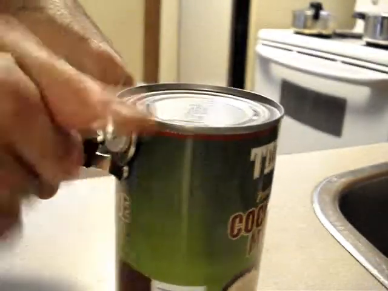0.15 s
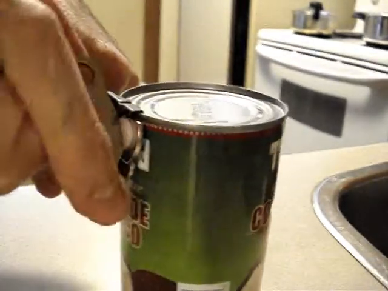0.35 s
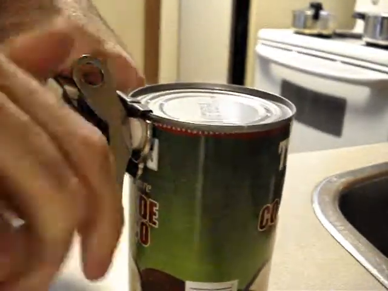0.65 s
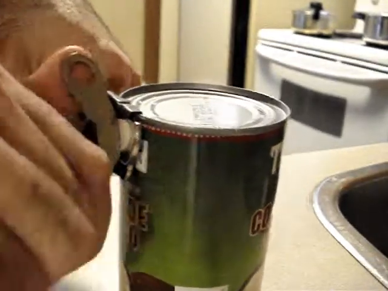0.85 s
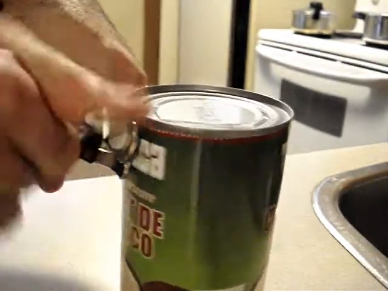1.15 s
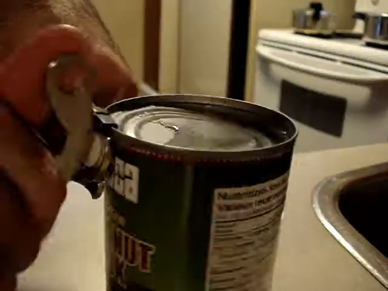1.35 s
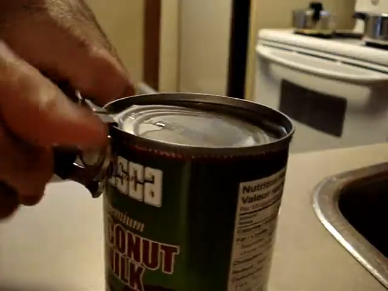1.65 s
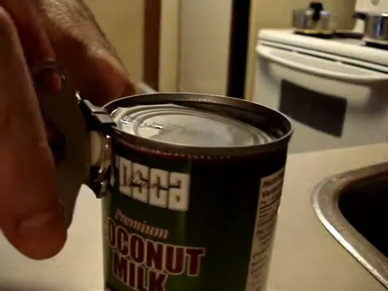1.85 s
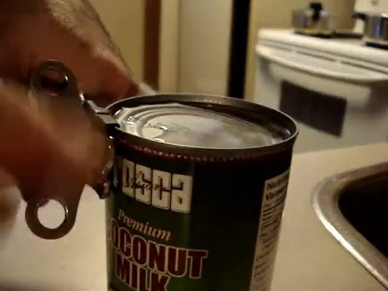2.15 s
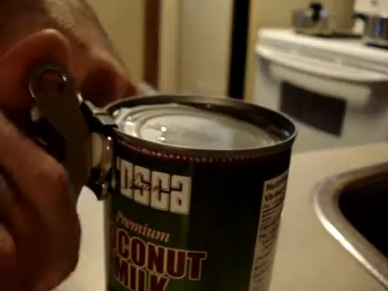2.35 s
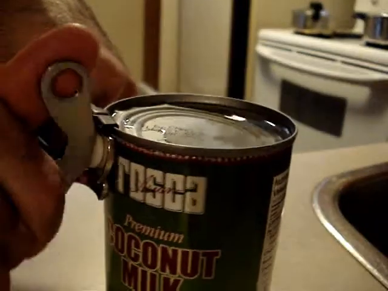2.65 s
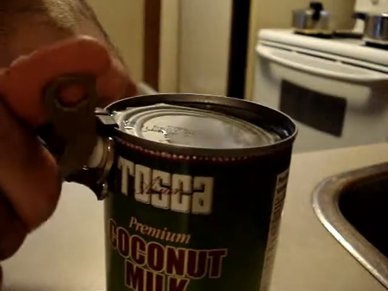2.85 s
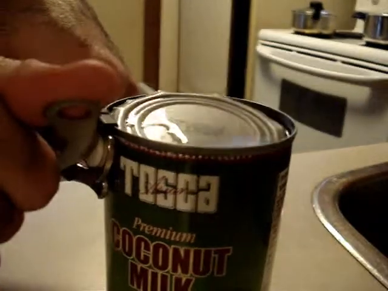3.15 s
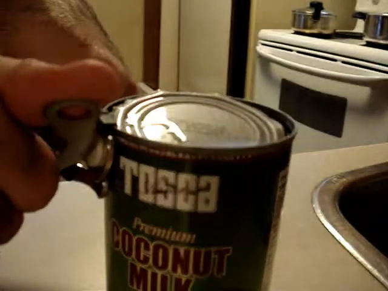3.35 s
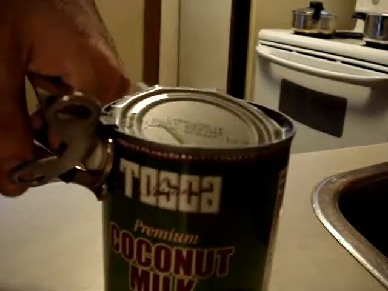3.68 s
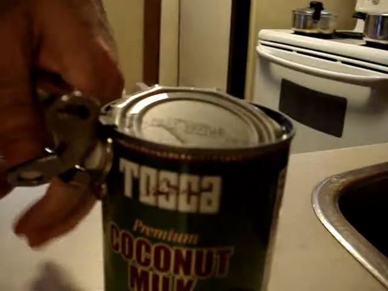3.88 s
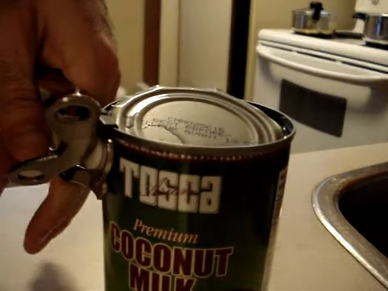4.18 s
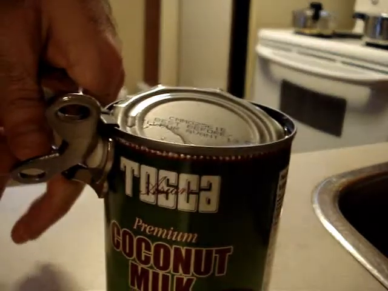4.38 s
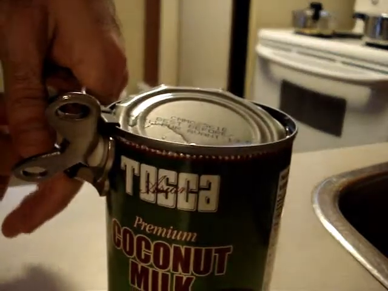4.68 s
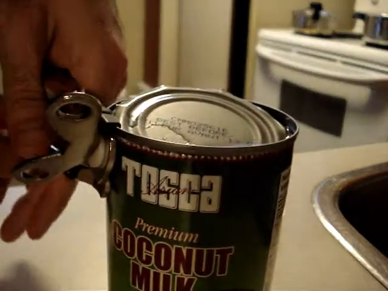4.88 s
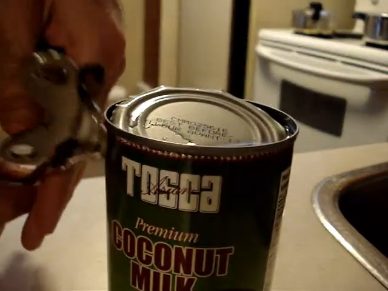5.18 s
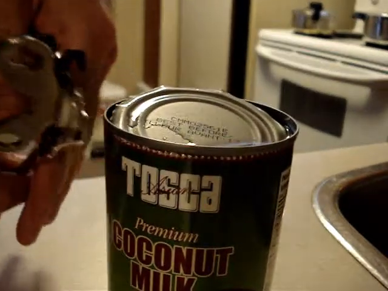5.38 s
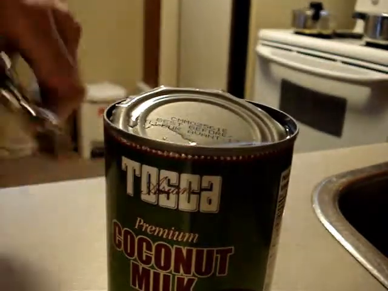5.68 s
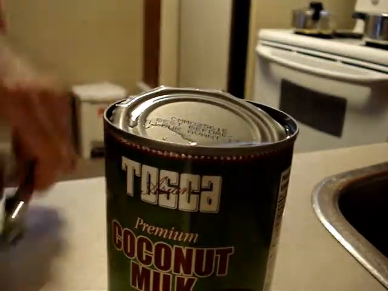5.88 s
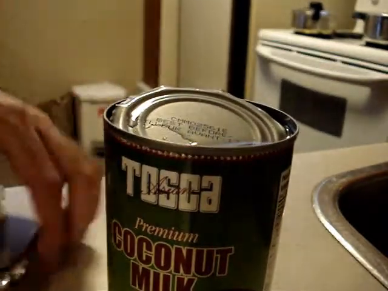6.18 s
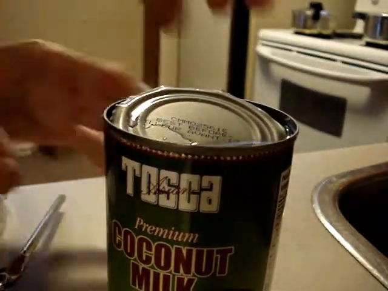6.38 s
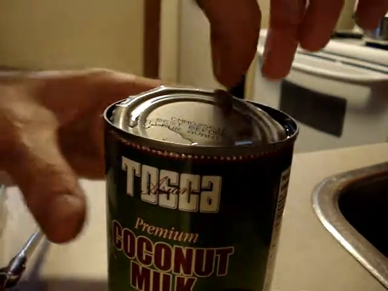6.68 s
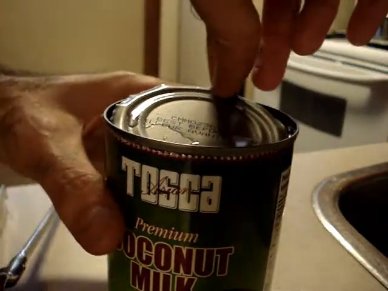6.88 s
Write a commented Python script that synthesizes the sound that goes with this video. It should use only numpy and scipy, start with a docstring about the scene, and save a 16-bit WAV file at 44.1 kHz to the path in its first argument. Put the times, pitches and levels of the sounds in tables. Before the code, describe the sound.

Close to a small microphone in a kitchen, a hand-cranked opener starts cutting a full tin at about 0.1 s: uneven gritty scrapes in quick jerks, with piercing, wavering squeals, until 0.5 s. A dull tin thud falls at 0.9 s. Scraping resumes from 1.05 to 1.25 s, then grows almost continuous from 1.35 to 2.05 s, with a strong thud at 1.5 s and many high squeaks. Short isolated scrapes come at 2.65, 2.75 and 3.05 s, and a click with a soft tin knock at 3.7 s. Quiet hum and hiss remain until small knocks and ticks at 5.1 s and a sharper metallic click at 5.7 s. The opener lands loudly on the counter at 6.05 s, clatters hardest around 6.22-6.26 s, then knocks at 6.35 and 6.5 s. A short room echo dies into faint hum and hiss until 7 s.

```python
"""Tin opener on a kitchen counter

Close to a small microphone, a hand-cranked opener jerks round the rim of a full tin: gritty noise
scrapes, and wandering near-sines squeal. Decaying modes make the tin thud and the opener tick as it
comes off; it is laid on the counter and bounces, in noise that dies away band by band.
A kitchen echo follows, low rumble passes through the counter, and room hum and hiss lie underneath."""
import sys
import numpy as np
from scipy import signal
from scipy.fft import rfft, irfft
from scipy.io import wavfile
from scipy.ndimage import uniform_filter1d

SR = 44100
rng = np.random.default_rng(int(sys.argv[2]) if len(sys.argv) > 2 else 0)


def pcm_store(signal):
    """Save signal as 16-bit PCM."""
    levels = np.round(np.clip(np.atleast_2d(signal), -1, 1) * 32767)
    wavfile.write(sys.argv[1], SR, levels.astype(np.int16).T)


N = 310192  # samples, about 7 s

# room background over time: [t/s, hum level/dB, hiss level/dB]
FLOOR_LEVELS = [(0, -62.5, -60), (.6, -62, -59.5), (2.1, -65.5, -60), (2.8, -61.5, -57), (3.499, -62, -58),
                (3.75, -55, -56), (5, -52, -56.5), (6, -49, -53.5), (6.3, -58.5, -60), (7.03, -52, -56)]
# relative spectrum of the room hum: [f/Hz, level/dB]
HUM_SPECTRUM = [(12, -36), (20, 2.5), (38, -10.5), (115, -8), (250, -4.5), (292, -2.5), (664, -5.5),
                (742, -5), (4000, -20), (5200, -35.5), (8800, -120)]
# relative spectrum of the hiss: [f/Hz, level/dB]
HISS_SPECTRUM = [(880, -4), (1500, -4.5), (3220, -7.5), (3880, -6.5), (5710, -10), (7170, -10.5),
                 (7760, -9.5), (9650, -12), (10600, -24.5), (15100, -20.5), (16000, -30.5)]
# thin tones of fixed pitch in the hiss: [f/Hz, mean level over the hiss/dB]
WHINE_TONES = [(7000, -22.5), (7555, -18), (7585, -12.5), (8000, -23), (8300, -18)]
HUM_TONE_HZ = 115

# jerks of the cutting wheel: [t/s, length/s, scrape level/dB]
SLIPS = [(0.079, 0.026, -32.5), (0.121, 0.016, -33), (0.136, 0.017, -29.5), (0.162, 0.056, -29.5),
         (0.219, 0.034, -34.5), (0.28, 0.028, -36.5), (0.321, 0.028, -32), (0.352, 0.061, -32),
         (0.427, 0.018, -36.5), (0.457, 0.0076, -42.5), (1.058, 0.015, -34.5), (1.088, 0.014, -40),
         (1.102, 0.048, -33.5), (1.154, 0.079, -30.5), (1.335, 0.017, -40), (1.357, 0.0085, -40.5),
         (1.376, 0.012, -36), (1.406, 0.046, -36.5), (1.509, 0.077, -33), (1.595, 0.052, -31),
         (1.651, 0.052, -33.5), (1.708, 0.0357, -35), (1.758, 0.066, -32), (1.828, 0.075, -30.5),
         (1.914, 0.05, -32), (1.973, 0.036, -30.5), (2.042, 0.039, -55.5), (2.633, 0.043, -35.5),
         (2.69, 0.04, -52.5), (2.741, 0.0078, -50), (2.759, 0.014, -33.5), (3.051, 0.046, -31.5),
         (3.105, 0.041, -50.5)]
# relative spectrum of the scrape: [f/Hz, level/dB]
SCRAPE_SPECTRUM = [(88, -38.5), (150, -12.5), (504, -6.5), (1870, -15.5), (2270, -9.5), (2810, -11.5),
                   (4410, -4.5), (5360, -7), (7180, -4.5), (9630, -7.5), (10600, -12.5), (16000, -7)]
# squeals that stand out: [t/s, glide length/s, start f/Hz, end f/Hz, level/dB]
SQUEALS = [(0.091, 0.013, 2900, 3210, -31.5), (0.136, 0.016, 4390, 4530, -22.5),
           (0.143, 0.016, 3040, 3200, -30), (0.169, 0.02, 4370, 4410, -20.5),
           (0.176, 0.015, 6710, 6860, -23), (0.19, 0.037, 3490, 4140, -28), (0.22, 0.032, 9040, 8640, -39),
           (0.242, 0.018, 2170, 2270, -35.5), (0.244, 0.017, 9800, 9500, -26),
           (0.285, 0.022, 8600, 9100, -32), (0.329, 0.015, 9830, 9700, -27.5),
           (0.355, 0.026, 4180, 4210, -30), (0.396, 0.012, 4300, 4250, -28),
           (0.437, 0.0087, 7230, 8040, -30.5), (1.104, 0.044, 4400, 4280, -35),
           (1.133, 0.007, 7500, 7350, -19), (1.149, 0.021, 7500, 7500, -29.5),
           (1.153, 0.044, 4350, 3630, -28), (1.184, 0.026, 3600, 4470, -28),
           (1.207, 0.015, 8800, 8800, -27), (1.229, 0.014, 9840, 9800, -31.5),
           (1.343, 0.0093, 9300, 9790, -33.5), (1.424, 0.028, 3580, 3550, -29.5),
           (1.511, 0.018, 3106, 3300, -27.5), (1.535, 0.024, 3280, 3280, -29.5),
           (1.558, 0.041, 7300, 7960, -32.5), (1.563, 0.037, 3750, 4000, -26),
           (1.602, 0.019, 9400, 9770, -29), (1.615, 0.038, 7950, 7840, -26.5),
           (1.654, 0.023, 6570, 6700, -32), (1.683, 0.021, 7400, 7340, -24.5),
           (1.71, 0.02, 9200, 9800, -28.5), (1.734, 0.057, 6990, 7300, -33.5),
           (1.762, 0.012, 7970, 8300, -28), (1.798, 0.015, 8270, 8600, -26.5),
           (1.832, 0.0096, 7010, 6960, -23.5), (1.849, 0.029, 6920, 7470, -26),
           (1.85, 0.021, 7830, 8050, -26.5), (1.876, 0.026, 7100, 7300, -31),
           (1.89, 0.016, 8190, 8300, -26.5), (1.914, 0.024, 8000, 7000, -25.5),
           (1.934, 0.011, 4940, 5500, -25.5), (1.954, 0.031, 9500, 9370, -29),
           (1.994, 0.0084, 7700, 7300, -21), (2.63, 0.0071, 7780, 7820, -28.5),
           (2.641, 0.037, 8940, 9060, -25.5), (2.643, 0.036, 3150, 2990, -40.5),
           (2.645, 0.03, 1227, 1284, -46.5), (2.758, 0.013, 7500, 7180, -25),
           (3.052, 0.024, 7290, 7080, -32), (3.058, 0.031, 3550, 3320, -39.5),
           (3.083, 0.024, 2150, 2260, -38.5)]
# modes of wheel and lid for the lesser squeals: [centre f/Hz, highest level over the scrape/dB]
WHEEL_MODES = [(3200, -3), (4300, -2.5), (6100, -1), (7200, 2), (8500, 2), (9200, 0.5), (9800, -1.5)]
# mean rate while slipping, middle glide length, scale of the glide as a share of the pitch
LESSER_PER_S, LESSER_S, LESSER_GLIDE = 90, 0.0091, 0.03

# blows on the tin: [t/s, peak level of the ring/dB, f favoured/Hz]
THUDS = [(0.327, -28, 760), (0.431, -35.5, 821), (0.481, -31.5, 710), (0.907, -19, 830),
         (1.134, -35.5, 420), (1.386, -26.5, 820), (1.512, -17, 694), (1.648, -28.5, 408),
         (2.632, -42, 1260), (2.761, -40, 646), (3.141, -35.5, 1010), (3.705, -30.5, 579),
         (3.719, -33.5, 285), (5.101, -34.5, 296), (5.119, -31.5, 328), (5.141, -34.5, 659),
         (6.057, -11.5, 700), (6.35, -15, 1140), (6.502, -12.5, 1500), (6.508, -26.5, 274)]
# what rings in the tin: [centre f/Hz, relative level/dB, t60/s]
TIN_MODES = [(273.8, -5, 0.16), (407, -5.5, 0.059), (570, -1.5, 0.045), (818, 5.5, 0.038),
             (1033, 1.5, 0.036), (1538, 1, 0.044), (2047, -4.5, 0.057)]
# knocks of the opener: [t/s, peak level of the ring/dB, f favoured/Hz]
TICKS = [(2.7894, -49, 4750), (3.7074, -28, 3840), (5.1138, -36.5, 4090), (5.1412, -29, 4160),
         (5.1702, -30, 5460), (5.664, -30, 4600), (5.682, -17, 3270), (5.705, -42, 2530),
         (6.0536, -10.5, 2950), (6.2232, -10, 3050), (6.2423, -12, 2740), (6.247, -26, 6900),
         (6.262, -25.5, 2900), (6.351, -23, 2800), (6.5041, -23, 2860), (6.519, -34, 4270)]
# what rings in the opener: [centre f/Hz, relative level/dB, t60/s]
OPENER_MODES = [(2960, 5.5, 0.042), (3260, 1, 0.026), (3857, 1, 0.057), (4310, 6.5, 0.014),
                (5260, -2, 0.047), (6930, 5.5, 0.039), (8050, 21.5, 0.0091), (9000, 14.5, 0.028)]

# the opener meets the counter: [t/s, relative level/dB, brightness/dB per octave]
BANGS = [(6.052, -4.5, -0.5), (6.109, -23.5, 1), (6.221, -0.5, 0.5), (6.243, 1.5, -0.5), (6.262, -18, -5.5),
         (6.35, -12, -0.5), (6.503, -12, 0), (6.519, -21.5, -3)]
# relative spectrum of the counter when struck: [f/Hz, level/dB]
COUNTER_SPECTRUM = [(15, -24), (35, -19.5), (70, -35), (170, -43), (280, -14), (480, -15.5), (1000, -6),
                    (1500, -2.5), (3200, -10), (5400, -25), (7400, -30.5), (10500, -30.5), (12000, -43),
                    (14000, -29), (16000, -37)]
# how long the counter rings: [f/Hz, t60/s]
COUNTER_DECAY = [(100, 0.24), (800, 0.21), (2000, 0.16), (5000, 0.11), (14000, 0.31)]

ROOM_T60_S, ROOM_DB = 0.31, -13
DRY_SHARE = .35  # share of squeals and ticks that reaches the echo
TOP_HZ = 15900  # upper limit of the recorder


def undb(db):
    """Turns dB into an amplitude factor."""
    return 10 ** (np.asarray(db) / 20)


def unit(x):
    """Scales x to rms 1."""
    return x / np.sqrt(np.mean(x ** 2))


def read(table, hz):
    """Reads a table by frequency, on a log-frequency axis."""
    f, value = np.transpose(table)
    return np.interp(np.log(np.maximum(hz, 1)), np.log(f), value)


def colour(x, table):
    """Filters x by the spectrum of a table and scales it to rms 1."""
    gain = undb(read(table, np.fft.rfftfreq(len(x), 1 / SR)))
    return unit(irfft(rfft(x) * gain, len(x)))


def walk(rate, size):
    """Random levels, a new one every 1 / rate s, smoothed twice; spread near 1."""
    hold = max(int(SR / rate), 1)
    steps = np.repeat(rng.standard_normal(size // hold + 1), hold)
    return 1.44 * uniform_filter1d(uniform_filter1d(steps, hold), hold)[:size]


def add(out, s, x):
    """Mixes x in at s seconds."""
    i = int(s * SR)
    out[i:i + len(x)] += x[:N - i]


def fade(t, t60):
    """Exponential decay by 60 dB in t60 seconds."""
    return np.exp(-np.log(1000) * t / t60)


def background():
    """Room hum with a low tone, and hiss with thin tones; hum, hiss and tones follow their own levels."""
    t = np.arange(N) / SR
    s, hum_db, hiss_db = np.transpose(FLOOR_LEVELS)
    hum_tone = undb(-17 + 4 * walk(18, N)) * np.sin(2 * np.pi * HUM_TONE_HZ * t)
    hum_gain = undb(np.interp(t, s, hum_db) + 0.35 * walk(4.6, N))
    hum = hum_gain * (colour(rng.standard_normal(N), HUM_SPECTRUM) + hum_tone)
    whine = sum(undb(db + 2. * walk(7.3, N)) * np.sin(2 * np.pi * hz * t) for hz, db in WHINE_TONES)
    hiss = colour(rng.standard_normal(N), HISS_SPECTRUM) + whine
    return hum + undb(np.interp(t, s, hiss_db)) * hiss


def push():
    """How hard the wheel scrapes: quick to start, a little slower to stop."""
    t, effort = np.arange(N) / SR, np.zeros(N)
    for s, length, db in SLIPS:
        start = np.clip((t - s) / .007 + .7, 0, 1) ** 2
        stop = fade(np.maximum(t - s - length, 0), 0.028)
        effort = np.maximum(effort, undb(db) * start * stop)
    return effort


def rumble(effort):
    """Low shaking passed on through the counter while the hand works."""
    shake = colour(rng.standard_normal(N), [(15, 1), (30, -6.5), (100, -9), (250, -18.0), (600, -54)])
    return undb(-19) * uniform_filter1d(effort, int(.08 * SR)) * shake


def tone(length, hz0, hz1):
    """Contact locked on to a mode of wheel or lid: a near sine that wanders and throbs, with a weak octave."""
    t = np.arange(int((length + .004) * SR)) / SR
    hz = np.interp(t, [0, length], [hz0, hz1]) + 110 * walk(700, len(t))
    phase = 2 * np.pi * np.cumsum(hz) / SR
    # fast unevenness spreads a noisy skirt round the line
    rasp = 1 + .25 * walk(1800, len(t))
    # only squeals that end below 7 kHz carry the octave
    octave = undb(-18.0) * np.sin(2 * phase) * (hz1 < 7000)
    # linear rise in 0.86 ms, linear fall in 2.6 ms
    shape = np.sqrt(2) * np.clip(np.minimum(t / 0.00086, (t[-1] - t) / 0.0026), 0, 1)
    throb = undb(2.96 * np.minimum(walk(330, len(t)), 1.2))
    return throb * shape * rasp * (np.sin(phase) + octave)


def scrape():
    """Dense grit clicks of uneven size, and a swarm of faint brief squeals at pitches spread at random."""
    grit = rng.standard_normal(N) * undb(2. * rng.exponential(size=N))
    swarm = np.zeros(N)
    for when, length, pitch, glide, size in rng.random((1300, 5)):
        hz = 1000 + 10000 * pitch
        squeal = tone(.002 + .014 * length ** 2, hz, hz + 500 * (glide - .4))
        add(swarm, 3.3 * when, undb(10 * size) * squeal)
    return colour(unit(grit) + undb(-1.5) * unit(swarm), SCRAPE_SPECTRUM)


def squeals():
    """Stick and slip at the rim: loud squeals one by one, lesser ones by chance within the jerks."""
    out = np.zeros(N)
    for s, length, hz0, hz1, db in SQUEALS:
        add(out, s - .001, undb(db) * tone(length, hz0, hz1))
    for s, slip, slip_db in SLIPS:
        chance = rng.random((8, 7))  # up to eight lesser squeals a jerk
        for keep, when, mode, length, tune, glide, size in chance:
            if keep < LESSER_PER_S * slip / len(chance):
                hz, db = WHEEL_MODES[int(mode * len(WHEEL_MODES))]
                hz = hz * (1 + .06 * (tune - .5))
                end_hz = hz * (1 + LESSER_GLIDE * (2 * glide - .7))
                squeal = tone(LESSER_S * (.5 + length), hz, end_hz)
                add(out, s + .7 * slip * when, undb(slip_db + db - 9.9 * size) * squeal)
    return out


def strike(blows, modes, slope_db, crack_db, contact_s):
    """Blows ring shared modes, favouring those near their own pitch; rattle roughens them over a noise crack."""
    out, t = np.zeros(N), np.arange(SR // 4) / SR
    hz, db, t60 = np.transpose(modes)[:, :, None]
    for s, peak_db, blow_hz in blows:
        chance = rng.standard_normal((2, len(modes), 1))
        # slope_db is lost per octave away from the pitch of the blow
        gain = undb(db - slope_db * abs(np.log2(hz / blow_hz)) + 2. * chance[0])
        rattle = np.array([1 + 1.07 * walk(420, len(t)) for _ in modes])
        sines = np.sin(2 * np.pi * hz * (1 + 0.017 * chance[1]) * t)
        ring = np.sum(gain * rattle * fade(t, t60) * sines, axis=0)
        ring = ring * (1 - np.exp(-t / contact_s))  # a softer contact rises more slowly
        crack_spectrum = [(60, -40), (180, -12), (blow_hz, 0), (10000, -8), (15000, -14)]
        crack = colour(rng.standard_normal(len(t)), crack_spectrum) * fade(t, 0.041)
        add(out, s, undb(peak_db) * (ring / abs(ring).max() + undb(crack_db) * crack))
    return out


def bangs():
    """The counter has too many modes to tell apart: noise with a stronger onset dies away band by band."""
    out, t = np.zeros(N), np.arange(SR // 2) / SR
    f = np.fft.rfftfreq(len(t), 1 / SR)
    for s, level_db, tilt_db in BANGS:
        spectrum = rfft(colour(rng.standard_normal(len(t)), COUNTER_SPECTRUM))
        bang = 0
        for hz in 30 * 2 ** np.arange(10):  # overlapping bands, an octave apart
            weight = np.clip(1 - abs(np.log2(np.maximum(f, 1) / hz)), 0, 1)
            band = irfft(spectrum * weight, len(t))
            tilt = undb(tilt_db * np.log2(hz / 1500))
            bang = bang + tilt * band * fade(t, read(COUNTER_DECAY, hz))
        onset = 1 + 0.26 * fade(t, 0.025)
        add(out, s, undb(level_db - 12) * bang * onset)
    return out


def kitchen(x):
    """Kitchen echo: decaying noise that starts after the first wall, duller than the direct sound."""
    t = np.arange(SR // 2) / SR
    echo = colour(rng.standard_normal(len(t)), [(200, 4), (3000, 0.0), (12000, -8.0)])
    echo = echo * fade(t, ROOM_T60_S) * (t > .004)
    return undb(ROOM_DB) * signal.fftconvolve(x, echo / np.sqrt(np.sum(echo ** 2)))[:N]


def scene():
    """Sums the opener, tin and counter with their echo, the rumble and the room background."""
    effort = push()
    # the wheel judders, so scrape and squeals flutter together
    judder = undb(1.47 * np.minimum(walk(170, N), 1))
    thuds = strike(THUDS, TIN_MODES, slope_db=7, crack_db=-20.5, contact_s=0.0013)
    ticks = strike(TICKS, OPENER_MODES, slope_db=18.5, crack_db=-13, contact_s=0.00016)
    near = judder * effort * scrape() + thuds + bangs()
    # squeals and ticks sound drier than the scrape and the blows
    drier = judder * squeals() + ticks
    room = kitchen(near + DRY_SHARE * drier)
    return (near + drier + room + rumble(effort) + background())[None]


def record(dry):
    """The recorder rounds the loudest peaks (tanh) and cuts the top (steep low-pass)."""
    rounded = np.tanh(1.045 * dry) / 1.188
    top_cut = signal.ellip(10, .2, 80, TOP_HZ, fs=SR, output="sos")
    return signal.sosfilt(top_cut, rounded)


dry = scene()
out = record(dry)
pcm_store(out)
```